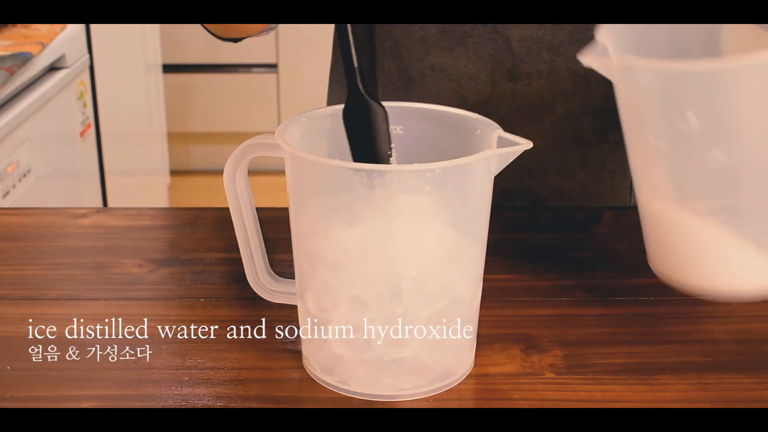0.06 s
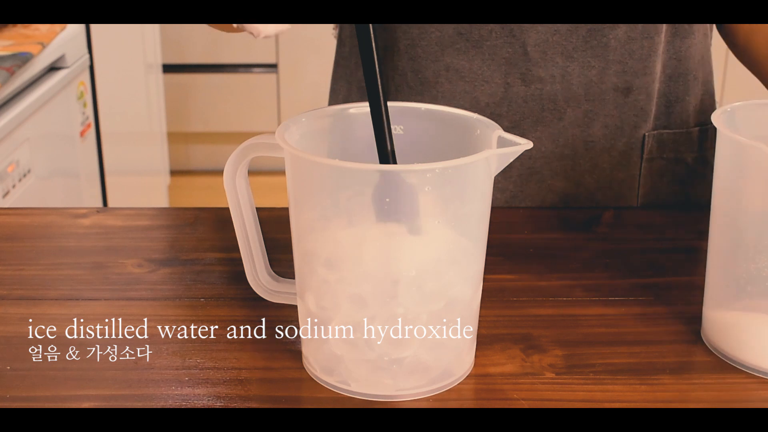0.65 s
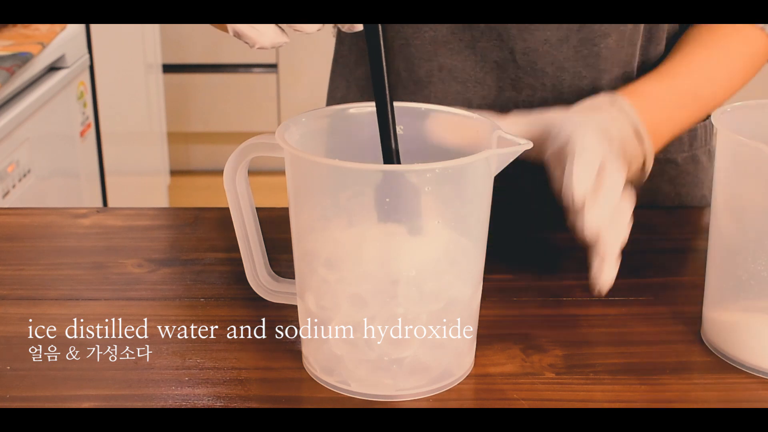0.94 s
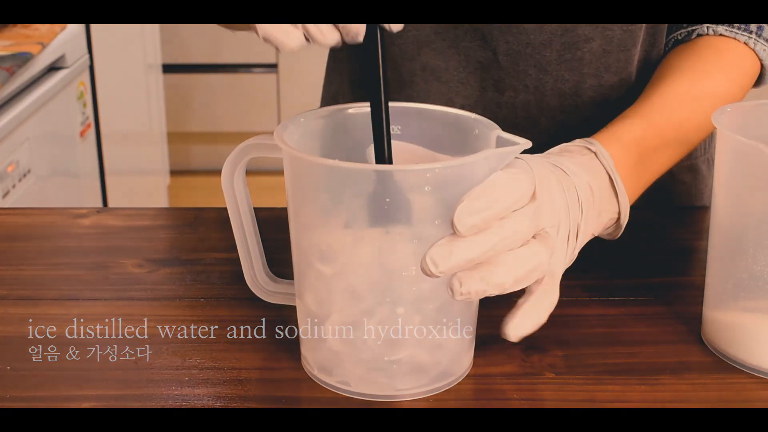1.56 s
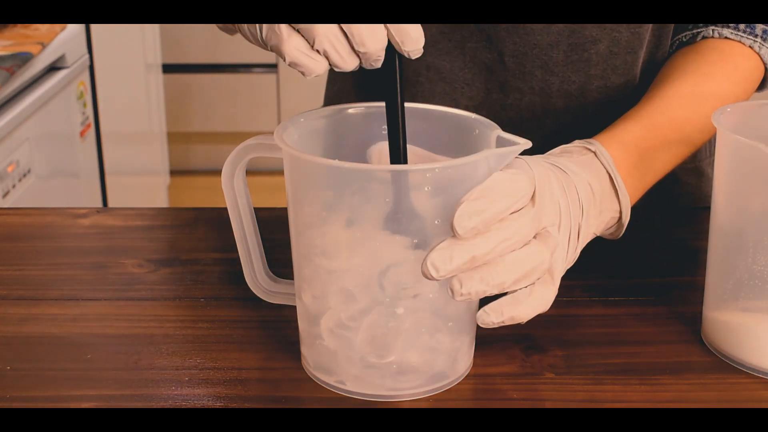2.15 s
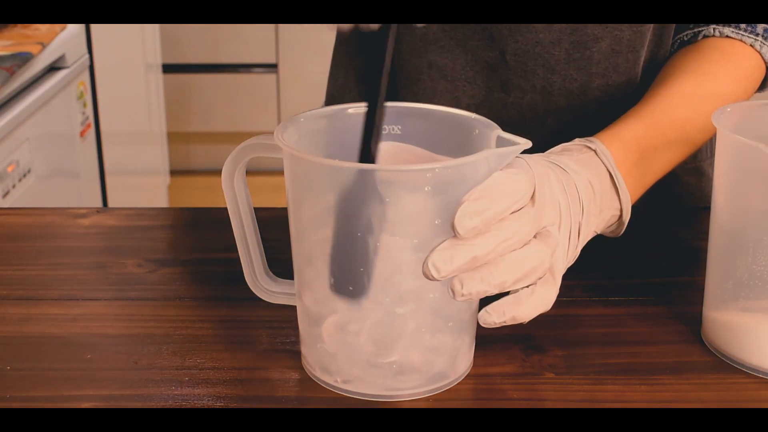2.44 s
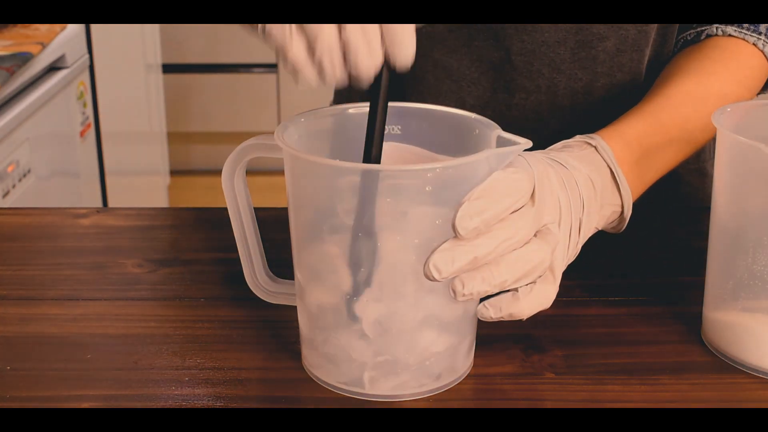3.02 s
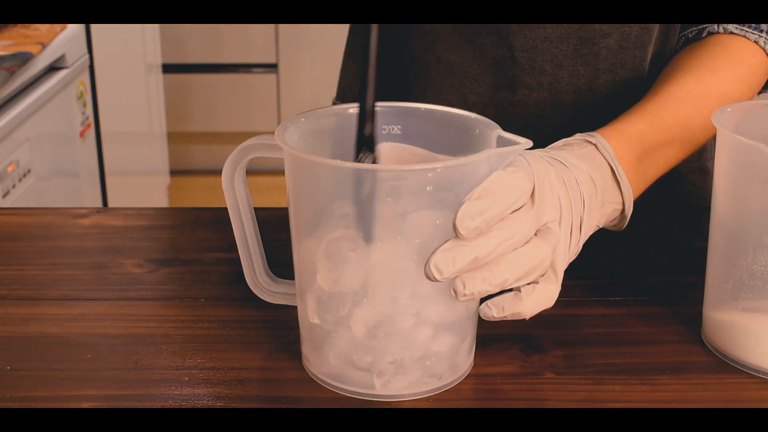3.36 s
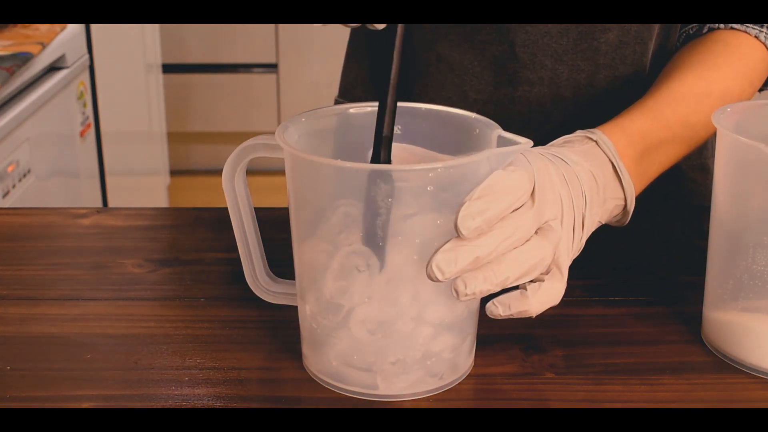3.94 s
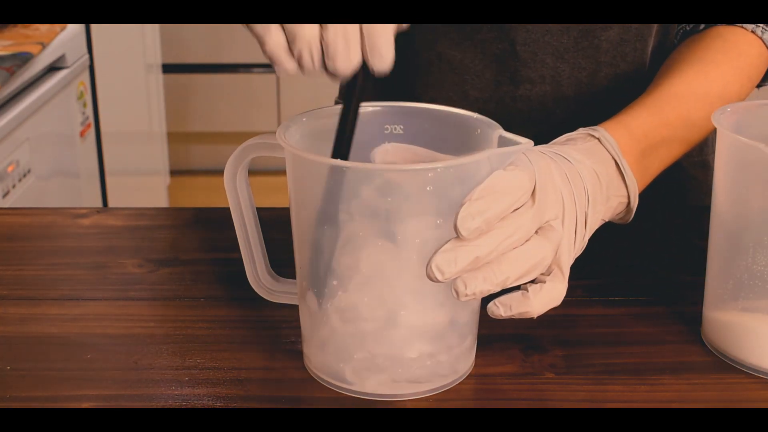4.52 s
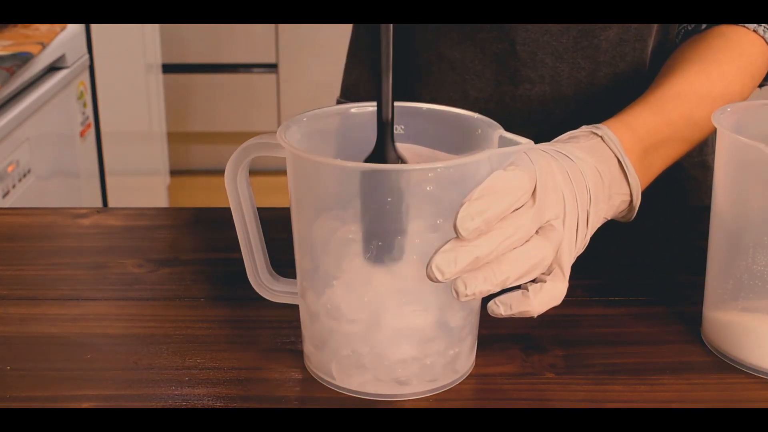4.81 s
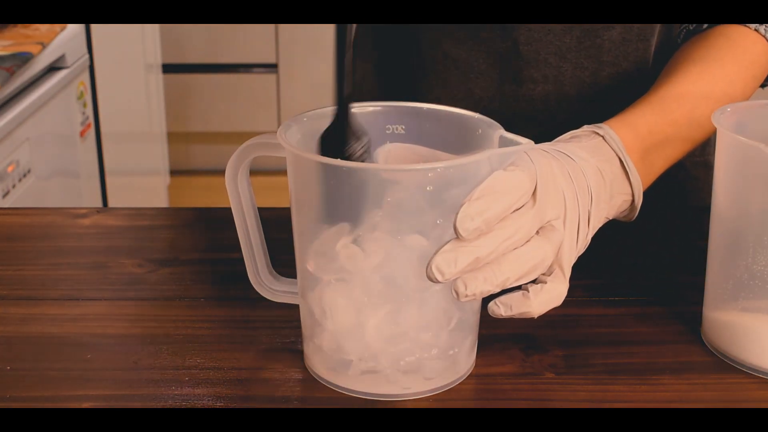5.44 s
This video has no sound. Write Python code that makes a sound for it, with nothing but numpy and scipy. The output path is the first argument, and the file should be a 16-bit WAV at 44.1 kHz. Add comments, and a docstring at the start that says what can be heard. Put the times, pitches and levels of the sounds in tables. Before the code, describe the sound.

A sleeve and rubber glove rustle faintly, and a plastic jug lands on a wooden table with a loud hollow knock, then rocks once. After a short lull with tiny ticks of ice, a spatula pushes through wet cubes in a second jug. They crunch and clack against each other and the plastic in uneven strokes, easing briefly before resuming. The microphone is close, in a small, slightly ringing room.

```python
"""Stirring ice in a plastic jug

A small room, one microphone close in. A plastic jug is set down on a wooden table and rocks once;
a sleeve and a rubber glove rustle. Then a spatula is pushed in strokes through wet ice in a second
jug: the cubes crunch and clack against each other and the plastic wall. The room rings behind it."""
import sys
import numpy as np
from scipy import signal
from scipy.fft import rfft, irfft
from scipy.io import wavfile

SR = 44100
rng = np.random.default_rng(int(sys.argv[2]) if len(sys.argv) > 2 else 0)


def log_audio(samples):
    """Write samples as a 16-bit WAV file to the path given in sys.argv[1]."""
    # one column per channel
    frames = np.atleast_2d(samples).T
    # limit to full scale, then quantise
    limited = np.clip(frames, -1, 1)
    pcm = np.round(limited * 32767).astype(np.int16)
    wavfile.write(sys.argv[1], SR, pcm)


N = 246078
TIME = np.arange(N) / SR

# shoves of the spatula that make the ice give way: start_s, length_s, level_db, hardness_db
SHOVES = [(1.546, 0.019, -34, -2), (1.615, 0.01, -27, -2), (1.66, 0.078, -38.5, 0),
          (1.727, 0.019, -27, -5.5), (1.763, 0.057, -32.5, -3), (1.96, 0.046, -46, 10),
          (2.029, 0.03, -31.5, -3.5), (2.275, 0.009, -40.5, -4), (2.51, 0.016, -31, 1.5),
          (2.566, 0.066, -30.5, 4), (2.68, .07, -46, 6), (2.742, .15, -38, 1.5), (2.994, 0.044, -36.5, 0.5),
          (3.029, 0.092, -28.5, -4), (3.126, 0.052, -21.5, 2.5), (3.211, 0.045, -38.5, 4),
          (3.298, 0.037, -32, 1.5), (3.365, 0.064, -44.5, -4), (3.531, 0.049, -31, -2),
          (3.598, 0.01, -28, 2), (3.742, .027, -34, 4.5), (3.787, 0.022, -41.5, -2.5),
          (4.232, .018, -36.5, -11.5), (4.325, 0.038, -30.5, -2.5), (4.436, 0.13, -52, 0),
          (4.529, 0.03, -34.5, 2.5), (4.587, 0.097, -39.5, 1), (4.817, 0.034, -29, -9.5),
          (4.887, 0.05, -32.5, -1), (4.933, .11, -28, -6), (5.07, .037, -27, 4), (5.134, 0.047, -35, 1.5),
          (5.196, .04, -30, 1.5), (5.278, .09, -43.5, 11), (5.368, 0.091, -39, 0.5)]
# the jug's base meets the table: start_s, level_db, contact_ms, hollow_ring_db
KNOCKS = [(0.3324, -1.5, 0.15, -9), (0.3346, 4, 0.84, -5.5), (0.3366, 3.5, 0.62, -3.5),
          (0.3378, 4, 0.61, -23), (0.3397, 2.5, 0.92, -28), (0.582, -18.5, 0.58, 2.5),
          (0.5981, -12.5, 0.71, 5.5), (0.6214, -13, 0.36, -10), (0.6298, -6, 0.6, -3)]


def stirring(attack_s=0.016, release_db_per_s=490, settle_db=-15.5, settle_db_per_s=113):
    """Level and hardness of the moving ice, in dB: each shove holds and lets go, and the cubes settle."""
    power, hardness = 1e-14, 0
    for start_s, length_s, level_db, hard_db in SHOVES:
        push = swell(start_s, length_s, attack_s, release_db_per_s)
        settle = undb(settle_db) * swell(start_s, length_s, attack_s, settle_db_per_s)
        share = (undb(level_db) * np.maximum(push, settle)) ** 2
        power += share
        hardness += share * hard_db
    return 10 * np.log10(power), hardness / power


def crunch(push_db, hard_db, peak_slips_per_s=860, scatter_db=6, gain_db=-2, room_db=-7, cubes=14):
    """The spatula grinds the cubes: many small slips, thicker when it pushes harder."""
    slips_per_s = peak_slips_per_s * undb(.25 * (push_db - push_db.max()))
    slipping = rng.random(N) < slips_per_s / SR
    slips = slipping * undb(scatter_db * np.clip(rng.standard_normal(N), -2, 2))
    # the slips share out the work that the spatula does from moment to moment
    window = signal.windows.hann(int(0.055 * SR))
    work = np.abs(signal.fftconvolve(slips ** 2, window / window.sum(), "same"))
    slips *= undb(push_db + gain_db) / np.sqrt(work + 0.046 * work.mean())
    # hard, dry contacts are brighter than those cushioned by water
    soft = butter(slips[::-1] + 1e-18, 2600, "low")[::-1]
    soft = butter(soft, 2600, "low")  # backwards, then forwards: no delay
    hardness = undb(np.clip(hard_db + 0.66, -9, 6))
    slips = soft + (slips - soft) * hardness
    # every few milliseconds another cube takes the load, with its own ring and paths to the walls
    loaded_cube = np.repeat(rng.integers(cubes, size=N), 128)[:N]
    out = np.zeros(N)
    for cube in range(cubes):
        blow = np.pad(cube_contact(tick_db=-2, wall_db=-17), (0, 16384))
        blow = rng.choice([-1, 1]) * blow / np.linalg.norm(blow)
        out += through(slips * (loaded_cube == cube), blow + undb(room_db) * room(blow))
    return out


def clacks(push_db, gain_db=-1.5, ring_db=-11, ring_t60_s=0.12, room_db=-8):
    """Single cubes strike, each with a short pitch of its own; blows on the wall have more body."""
    # the loudest cubes that snap free: start_s, level_db, body_db, pitch_hz
    loud_clacks = [(1.5494, -30.5, 3.5, 1200), (1.6172, -22, 7.5, 1444), (1.6776, -24.5, -2, 1386),
                   (1.731, -16.5, -20, 2070), (1.7744, -17, -19, 1200), (1.948, -24.5, -11, 1200),
                   (2.0223, -25, -10, 1556), (2.0398, -22, -1, 1280), (2.0654, -21.5, 1.5, 1207),
                   (2.504, -16, -12.5, 1270), (2.5601, -20.5, -13, 1860), (2.6254, -19, -11, 1246),
                   (2.7681, -21, -16, 1290), (2.7955, -29, -14.5, 1400), (2.834, -20, -19, 1435),
                   (2.8724, -23, -13, 1750), (2.8928, -24, -13, 1410), (3.0465, -18, 2.5, 1286),
                   (3.1213, -20, 6.5, 1630), (3.1694, -11.5, -20, 1650), (3.1834, -22, -17, 1270),
                   (3.2954, -15.5, -25, 1570), (3.3199, -17.5, -17, 1240), (3.4165, -33.5, 1, 1760),
                   (3.454, -30.5, 2.5, 1420), (3.482, -32.5, 1, 1490), (3.5404, -18.5, 0.5, 1507),
                   (3.5764, -18, -15, 1520), (3.5982, -15, -17, 2070), (3.7384, -22, -17, 1545),
                   (3.933, -36, 7.5, 1390), (3.9978, -47.5, 10, 1390), (4.119, -50, 9, 1295),
                   (4.2627, -32.5, 10, 1270), (4.6543, -33, 9, 1220), (5.0165, -22, -20, 1150),
                   (5.0724, -12, -10, 1185), (5.1014, -23.5, -1, 1550), (5.1851, -23, -1, 1212),
                   (5.219, -22.5, -2.5, 1270), (5.3951, -25, -3, 1610), (5.5458, -36.5, -0.5, 1500)]
    out = np.zeros(N)
    for start_s, level_db, body_db, pitch_hz in loud_clacks + tumbles(push_db):
        blow = cube_contact(tick_db=-8.5, wall_db=-27.5)
        crack = butter(blow, 710, "high", order=1)
        peak = np.abs(crack).max()
        # cube against cube is a harder meeting than cube against plastic
        hardness = undb(-2 - .5 * np.clip(body_db, -12, 12))
        edge = butter(crack, 3800, "high", order=1) * hardness
        tone = butter(ring([(pitch_hz, ring_db, ring_t60_s)], size=len(blow)), 3700, "low")
        bright = (crack + edge) / peak + tone
        body = butter(blow - crack, 260, "high") / peak * undb(np.clip(body_db + 3, -12, 14))
        add(out, start_s, undb(level_db + gain_db) * (bright + body) / np.abs(bright).max())
    return out + undb(room_db) * room(out)


def tumbles(push_db, per_s=14, lift_db=3.5, scatter_db=4, pitch_range_hz=(1200, 2100)):
    """Lesser cubes tumble at random, louder as the ice moves more: start_s, level_db, body_db, pitch_hz."""
    first_s, last_s = SHOVES[0][0], SHOVES[-1][0] + SHOVES[-1][1]
    when, size, body, pitch = rng.random((int(per_s * (last_s - first_s)), 4)).T
    start_s = first_s + when * (last_s - first_s)
    level_db = np.interp(start_s, TIME, push_db) + lift_db + scatter_db * (2 * size - 1)
    body_db = -4.5 + 10 * (2 * body - 1)
    return list(zip(start_s, level_db, body_db, np.interp(pitch, [0, 1], pitch_range_hz)))


def cube_contact(tick_db, wall_db, clink_db=-5, clink_t60_s=.027, size=4096):
    """One cube's blow: a tick, a damped rattle, its own clink and the wall as struck at that spot."""
    # ring of one wet contact: frequency_hz, t60_s
    rattle_decays = [(300, 0.037), (1200, 0.066), (3500, 0.032), (10000, 0.0052)]
    # wall and air modes of the ice jug: pitch_hz, level_db, t60_s
    wall_modes = [(425.5, 0, 0.063), (594, -6, 0.14), (692.4, 1.5, 0.078), (1065.4, -4, 0.11),
                  (1290, -4.5, 0.076), (1630, -16.5, 0.015), (2070, 4, 0.039), (3030, 0, 0.077),
                  (3620, 7, 0.085), (5870, 1.5, 0.024)]
    # what the ice-filled jug radiates: frequency_hz, gain_db
    jug_spectrum = [(40, -45.5), (130, -23), (250, -20), (420, -5.5), (690, 1), (930, -4.5), (1200, -5),
                    (2100, -10.5), (2600, -19), (3500, -18.5), (6500, -32.5), (8800, -37), (10300, -54),
                    (15000, -57)]
    blow = dense_ring(rattle_decays, size)
    blow[0] += undb(tick_db)
    pitches_hz = np.geomspace(1000, 12000, 200)[rng.integers(200, size=7)]
    clink = ring([(hz, 10 * np.log10(hz / 12000), clink_t60_s) for hz in pitches_hz], size)
    blow += undb(clink_db) * clink / np.linalg.norm(clink)
    wall = ring([(hz, db + rng.normal(0, 5.5), t60_s) for hz, db, t60_s in wall_modes], size)
    blow += undb(wall_db) * wall / np.linalg.norm(wall)
    return colour(blow, jug_spectrum)


def jug_on_table(gain_db=4, room_db=-12, slap_s=.031, slap_db=-21, slide_db=-46):
    """The base lands edge first, chatters flat, slides and rocks back; a longer contact is duller."""
    # modes of the jug on the table: pitch_hz, level_db, t60_s
    table_modes = [(453, -6, 0.0574), (640, 3, 0.019), (688, 5, 0.018), (830, -10, 0.028),
                   (1060, -17.5, 0.022), (1584, -22, 0.0078), (2150, -24.5, 0.013), (2960, -16.5, 0.01017),
                   (4256, -18, 0.0085), (7500, -28.5, 0.0044)]
    # what the table top sends into the room: frequency_hz, gain_db
    table_spread = [(100, 3.5), (310, -7), (385, 3), (460, 0), (520, 2), (640, -1.5), (1000, 3.5),
                    (1700, 6), (3000, -6), (6000, -11)]
    # hollow ring after a knock: frequency_hz, t60_s
    hollow_decays = [(400, 0.091), (800, 0.13), (2500, 0.13)]
    body = butter(ring(table_modes), 335, "high", order=3)  # the table top radiates little bass
    body = np.pad(body, (0, 10000)) * undb(gain_db) / np.abs(body).max()
    out, lead_s = np.zeros(N), .001
    for start_s, level_db, contact_ms, hollow_db in KNOCKS:
        force = np.exp(-np.pi * ((TIME[:128] - lead_s) * 1000 / contact_ms) ** 2)
        blow = through(body, undb(level_db) * force / force.sum())
        spread = colour(blow, table_spread)
        hollow = through(spread, dense_ring(hollow_decays, size=4096))
        add(out, start_s - lead_s, blow + undb(hollow_db) * hollow + undb(room_db) * room(spread))
        add(out, start_s + slap_s, undb(slap_db) * spread)  # one distinct slap echo follows each knock
    scrape = through(rng.laplace(size=N), colour(body, table_spread))
    sliding = swell(start_s=0.462, length_s=0.069, attack_s=0.064, release_db_per_s=1100)
    return out + unit(scrape) * undb(slide_db) * sliding


def mic_overload(thud_hz=150, thud_db=-12, thud_t60_s=0.0084, crack_db=-31, crack_t60_s=0.0226):
    """A short low thud and a brief bright crack as the loudest knock overloads the microphone."""
    out, t = np.zeros(N), TIME[:4096]
    crack = butter(rng.standard_normal(len(t)), 7000, "low") * undb(crack_db - 60 * t / crack_t60_s)
    thud = butter(ring([(thud_hz, thud_db, thud_t60_s)], size=len(t)), 390, "low")
    add(out, KNOCKS[0][0], thud + crack)
    return out


def handling(grain_db=3, touch_gain_db=-2, attack_s=.02, release_db_per_s=105.5):
    """Sleeve and rubber glove rub in fine grains; the hand brushes the jug."""
    # rubs as the hands move: start_s, length_s, level_db
    rubs = [(0, 0.16, -61), (0.268, 0.03, -63), (0.343, 0.3, -61.5), (0.678, 0.052, -66),
            (0.904, 0.053, -63), (0.998, 0.076, -70.5), (1.259, 0.13, -71.5)]
    # tone of the rubbing: frequency_hz, gain_db
    cloth_spectrum = [(150, -14), (700, 14.5), (1500, 5), (3000, 2), (5000, -2), (8800, -7), (10300, -23.5),
                      (15000, -30.5)]
    # light touches on the jug: start_s, level_db
    touches = [(0.951, -41), (1.379, -48.5)]
    grains = rng.standard_normal(N)
    grains *= undb(grain_db * np.repeat(rng.standard_normal(N), 64)[:N])
    moves = [undb(db) * swell(s, length_s, attack_s, release_db_per_s) for s, length_s, db in rubs]
    out = unit(colour(grains, cloth_spectrum)) * np.max(moves, axis=0)
    for start_s, level_db in touches:
        touch = butter(cube_contact(tick_db=-10, wall_db=-20), 900, "low")
        add(out, start_s, undb(level_db + touch_gain_db) * touch / np.abs(touch).max())
    return out


def ice_ticks(gain_db=-3):
    """Resting ice settles with faint, thin ticks."""
    # ticks before the stirring: start_s, level_db
    ticks = [(0.2713, -47), (0.293, -47), (0.4393, -40), (0.509, -44), (0.533, -51), (1.054, -49),
             (1.323, -54)]
    out = np.zeros(N)
    for start_s, level_db in ticks:
        tick = butter(cube_contact(tick_db=-9, wall_db=-20.5), 3200, "high")
        add(out, start_s, undb(level_db + gain_db) * tick / np.abs(tick).max())
    return out


def room(x, build_s=0.0034):
    """Diffuse echoes of a small room build up at the microphone just after the direct sound."""
    # reverberation time: frequency_hz, t60_s
    room_decays = [(200, 1), (600, 0.36), (1500, 0.42), (4000, 0.2), (10000, 0.089)]
    echoes = dense_ring(room_decays, size=16384)
    build_up = 1 - np.exp(-(TIME[:len(echoes)] / build_s) ** 2)
    return through(x, echoes * build_up)


def room_tone(air_db=-64, low_cut_hz=55):
    """Still air and a faint, steady hum lie under everything."""
    # noise of the air: frequency_hz, gain_db
    air_spectrum = [(18, -41), (30, -21), (103, -18.5), (280, -9), (364, -12), (473, -4), (702, -3.5),
                    (780, -8.5), (1130, -11), (1390, -15.5), (6050, -34), (16000, -51)]
    # hum in the room: pitch_hz, level_db
    hum_tones = [(473.7, -71.5), (532.9, -80)]
    air = butter(colour(rng.standard_normal(N), air_spectrum), low_cut_hz, "high")
    hum = sum(undb(db) * unit(np.sin(2 * np.pi * hz * TIME)) for hz, db in hum_tones)
    return unit(air) * undb(air_db) + hum


def ring(modes, size=6000):
    """Damped modes struck together: pitch_hz, level_db, t60_s."""
    t = TIME[:size]
    return sum(undb(db - 60 * t / t60_s) * np.cos(2 * np.pi * hz * t) for hz, db, t60_s in modes)


def dense_ring(decays, size, bands=8):
    """Countless modes: bands of noise that die at their own rates; flat spectrum, energy near 1."""
    t, hz = TIME[:size], np.fft.rfftfreq(size, 1 / SR)
    edges_hz = np.geomspace(100, SR / 2, bands + 1)
    noise, out = rfft(rng.standard_normal(size)), np.zeros(size)
    for low, high in zip(edges_hz, edges_hz[1:]):
        t60_s = lookup(decays, np.sqrt(low * high))
        band = irfft(noise * (hz >= low) * (hz < high), size) * undb(-60 * t / t60_s)
        out += band * np.sqrt((high - low) / (SR / 2) / np.sum(band ** 2))
    return out


def swell(start_s, length_s, attack_s, release_db_per_s):
    """Gain that reaches 1 at start_s, holds, then falls away."""
    rise = np.clip(1 + (TIME - start_s) / attack_s, 0, 1)
    return rise * undb(-release_db_per_s * np.maximum(TIME - start_s - length_s, 0))


def colour(x, spectrum, size=2048):
    """Causal filter with the given spectrum, so attacks stay sharp."""
    gain = undb(lookup(spectrum, np.fft.rfftfreq(size, 1 / SR)))
    cepstrum = irfft(np.log(gain))
    cepstrum[1:size // 2] *= 2
    cepstrum[size // 2 + 1:] = 0
    return through(x, irfft(np.exp(rfft(cepstrum))))


def butter(x, hz, kind, order=2):
    """Plain low- or high-pass."""
    return signal.sosfilt(signal.butter(order, hz, kind, fs=SR, output="sos"), x)


def through(x, response):
    """Pass a sound through an impulse response."""
    return signal.oaconvolve(x, response)[:len(x)]


def lookup(table, hz):
    """Read (frequency_hz, value) points on a log-frequency axis."""
    points_hz, values = np.transpose(table)
    return np.interp(np.log(hz + 1e-3), np.log(points_hz), values)


def add(out, start_s, sound):
    """Mix a sound in at start_s."""
    i = int(start_s * SR)
    out[i:i + len(sound)] += sound[:N - i]


def undb(db):
    """Decibels to gain."""
    return 10 ** (np.asarray(db) / 20)


def unit(x):
    """Scale to rms 1."""
    return x / np.sqrt(np.mean(x ** 2))


def scene():
    """Ice, table and hands close to one microphone, over the room tone."""
    background = room_tone()
    push_db, hard_db = stirring()
    ice = crunch(push_db, hard_db) + clacks(push_db) + ice_ticks()
    ice = butter(ice, 110, "high", order=1)
    return (ice + jug_on_table() + mic_overload() + handling() + background)[None]


def record(dry, top_hz=15900):
    """The recorder rounds off the loudest knock and cuts the top."""
    rounded = dry / (1 + np.abs(dry) ** 6) ** (1 / 6)
    return signal.sosfilt(signal.ellip(8, .2, 70, top_hz, fs=SR, output="sos"), rounded)


dry = scene()
out = record(dry)
log_audio(out)
```